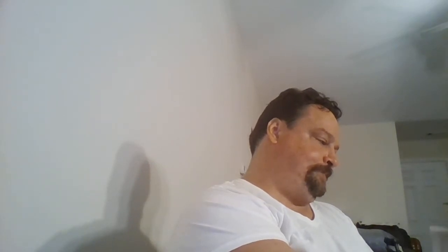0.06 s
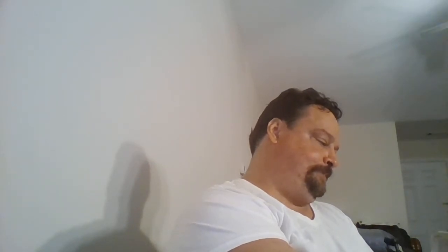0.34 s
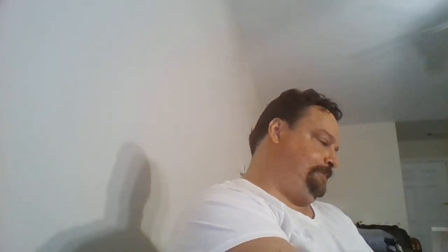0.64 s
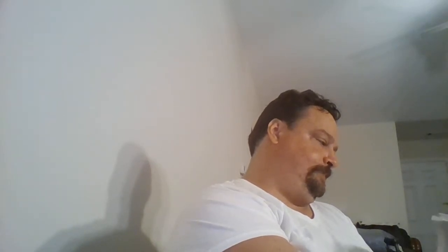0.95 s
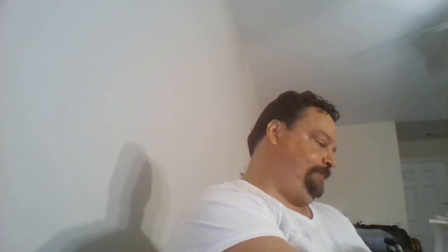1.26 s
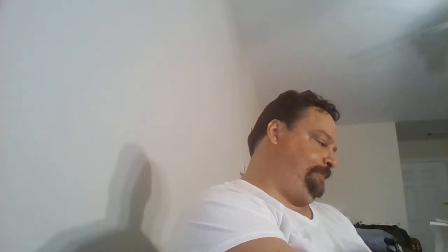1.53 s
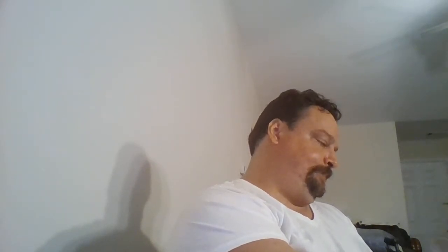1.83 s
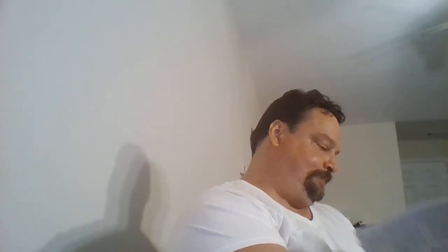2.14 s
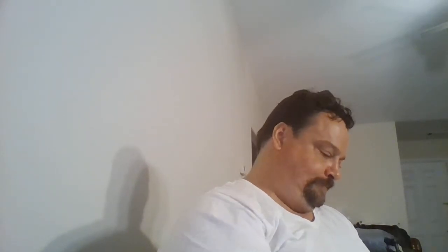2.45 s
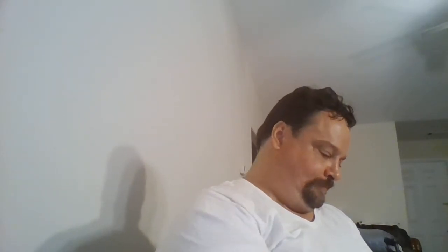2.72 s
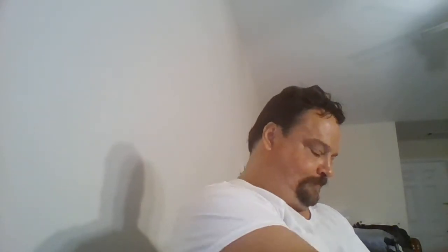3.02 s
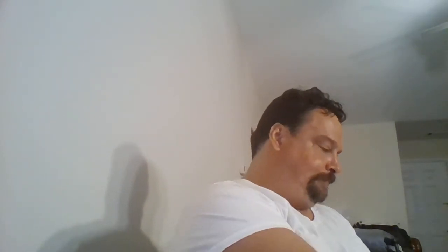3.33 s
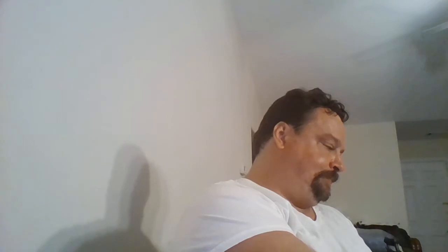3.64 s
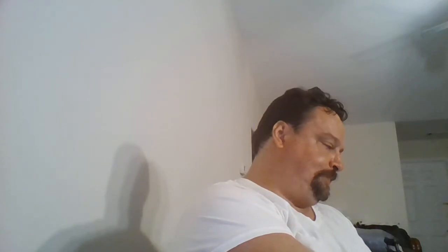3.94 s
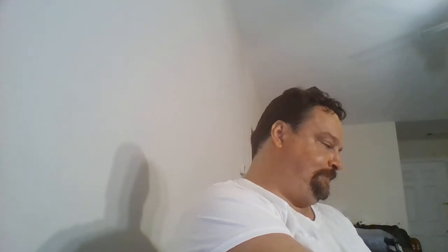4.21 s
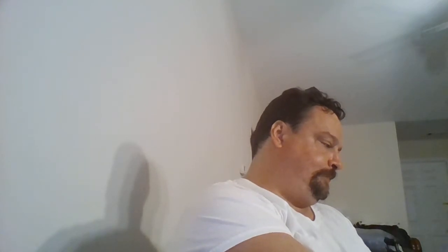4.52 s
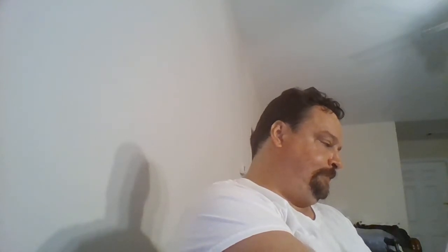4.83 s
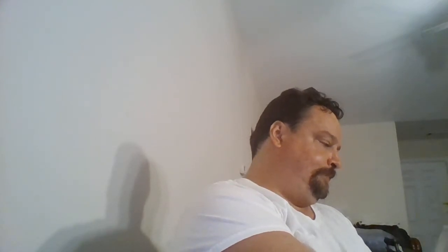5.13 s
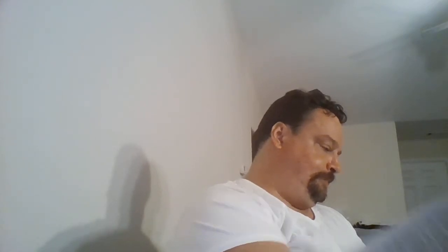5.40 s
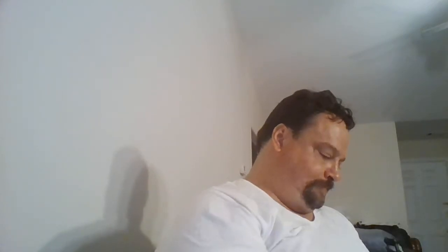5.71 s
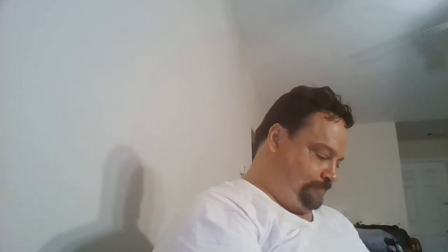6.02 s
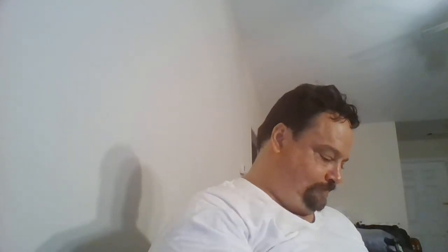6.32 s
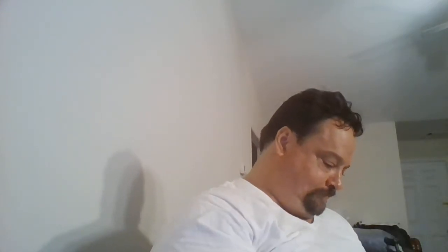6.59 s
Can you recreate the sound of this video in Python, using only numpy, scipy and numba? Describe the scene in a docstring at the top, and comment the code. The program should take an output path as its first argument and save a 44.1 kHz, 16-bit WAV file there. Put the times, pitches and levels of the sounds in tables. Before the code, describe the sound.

Two book pages are turned close by, with soft rustling, finger brushing and one crisp snap, over a faint room hum.

```python
"""Fingers slide over paper: someone leafs through a book, close to one microphone in a small, quiet room.
Two pages are turned; each sheet bends, crackles and swishes over its neighbour. The first lands with a
soft thud, the second snaps taut, which makes the recorder's limiter duck the room hum for a moment.
The microphone has a bright resonance. Behind the book lie air noise, fan tones, a faint, high
electronic whine, a motor hum and a second thin whine that swells once."""
import sys
import numpy as np
from scipy import signal
from scipy.fft import rfft, irfft
from scipy.io import wavfile
from scipy.ndimage import uniform_filter1d, minimum_filter1d
from numba import njit

SR = 44100
rng = np.random.default_rng(int(sys.argv[2]) if len(sys.argv) > 2 else 0)


def unload_wav(signal):
    """Save mono or channel-first audio to the path in sys.argv[1] as 16-bit WAV at rate SR, clipped to [-1, 1]."""
    wavfile.write(
        sys.argv[1],
        SR,
        np.round(np.clip(np.atleast_2d(signal).T, -1, 1) * 32767).astype(np.int16),
    )


N = 302514
TIME = np.arange(N) / SR
FLEX_RISE = 0.13  # share of a flex spent rising: paper bends quickly and relaxes slowly

# spectrum of a buckling sheet (frequency [Hz], level [dB])
BUCKLE_SPECTRUM = [(200, -32), (800, -11), (1400, 3), (1900, -4.5), (2500, 0.5), (3400, -12), (5000, -10),
                   (16000, -46)]
# spectrum of a soft thud or puff of air (frequency [Hz], level [dB])
THUD_SPECTRUM = [(30, -66), (70, -14), (160, 1.5), (290, -1.5), (420, -2), (600, -9.5), (1500, -12),
                 (5000, -35)]


def turning_sheets(slide_db=-5, bend_db=-1, edge_db=-2):
    """A turning sheet hisses along its neighbour, rustles lower where it bends, and its edge scrapes."""
    # spectra of sliding, bending and edge scraping (frequency [Hz], level [dB])
    slide_spectrum = [(300, -26), (1500, -39), (3500, -5), (5000, -6.5), (7000, -4), (9000, -3.5),
                      (11500, -5), (13500, -10), (16000, -20.5)]
    bend_spectrum = [(40, -52), (100, -10.5), (200, -5.5), (330, -1), (500, -11), (700, -2), (950, -11.5),
                     (1500, 2), (1900, -2.5), (2500, 2.5), (3300, -11), (5000, -9), (16000, -66)]
    edge_spectrum = [(1000, -21), (2400, -13), (3000, -1), (3500, 5), (4300, -1.5), (5500, -2), (8000, -31),
                     (16000, -52)]
    # how hard the paper slides, one list for each sheet (time [s], level [dB])
    slides = [
        [(2.14, -56), (2.3, -35), (2.34, -42), (2.386, -35.5), (2.422, -44.5), (2.444, -35.5), (2.48, -64),
         (2.5, -61)],
        [(5.222, -61.5), (5.244, -49), (5.262, -56), (5.332, -49.5), (5.396, -27.5)],
    ]
    # the sheet flexes (peak time [s], length [s], level [dB])
    flexes = [(2.226, 0.079, -42), (2.295, 0.061, -40), (2.40, .1, -57), (2.497, 0.028, -53.5),
              (2.562, 0.015, -58), (2.62, 1, -66.5), (5.236, 0.064, -48), (5.29, 0.22, -50),
              (5.383, 0.039, -41.5)]
    # its edge drags harder and harder, then slips free (peak time [s], length [s], level [dB])
    drags = [(2.248, 0.063, -49), (2.298, 0.016, -35), (2.451, .045, -38.5), (5.25, 0.011, -44.5),
             (5.397, 0.076, -44)]
    slide = friction(slide_spectrum, slips_per_s=17000, spread_db=0.5, patchy_db=2.0)
    bend = friction(bend_spectrum, slips_per_s=14000, spread_db=0.9, patchy_db=3.0)
    edge = friction(edge_spectrum, slips_per_s=9000, spread_db=4.5, patchy_db=6.5)
    return (undb(slide_db) * slide * curve(slides)
            + undb(bend_db) * bend * swells(flexes, FLEX_RISE)
            + undb(edge_db) * edge * swells(drags, rise=0.73))


def snap(crackle_db=-19, crackle_s=0.0033):
    """Each jerk of the taut sheet is a sharp pressure pulse with a brief crackle of creases behind it."""
    # the second sheet snaps taut and flaps (time [s], strength [dB])
    jerks = [(5.4016, 9.5), (5.4046, 7), (5.4131, -2), (5.4149, 1), (5.4294, -9)]
    # spectrum of the snap (frequency [Hz], level [dB])
    snap_spectrum = [(200, -19), (1000, -13), (2000, -2.5), (3800, 5), (6500, 9), (9200, 9.5), (11500, 3),
                     (13500, -8), (16000, 0)]
    pulses, size = np.zeros(N), SR // 30
    for start, db in jerks:
        jerk = undb(crackle_db) * rng.standard_normal(size) * np.exp(-TIME[:size] / crackle_s)
        jerk[0] = 1
        i = int(start * SR)
        pulses[i:i + size] += undb(db) * jerk
    return colour(pulses, snap_spectrum)


def fingers(hiss_db=-6.5, scrape_db=-2, rise=0.41):
    """Dry skin brushes the paper: a fine hiss when light, a coarser scrape when it presses."""
    # finger strokes (peak time [s], length [s], hiss level [dB], pressure as extra scrape level [dB])
    strokes = [(0.01, 0.072, -62.5, -4), (0.799, 0.076, -59, -0.5), (.97, 0.045, -65, -14),
               (1.127, 0.08, -62.5, -3), (1.838, 0.17, -59, -2.5), (1.95, 0.038, -59, -9),
               (2.056, 0.12, -51.5, -6), (2.53, 0.22, -56, -1.5), (2.78, 0.37, -65.5, -2),
               (3.017, 0.03, -48, -16), (3.132, 0.098, -53, -13), (3.295, 0.14, -55.5, -11),
               (3.37, 0.15, -57, -7), (3.496, 0.087, -53, -6.5), (3.586, .11, -50, -12.5),
               (3.864, 0.065, -58, -5), (4.01, 0.33, -63.5, -4.5), (4.18, 0.098, -67, -1.5),
               (4.325, 0.038, -62.5, -5), (4.488, 0.045, -60.5, -3.5), (4.612, 0.025, -64, 6),
               (4.667, .06, -64, -7), (4.82, .09, -64.5, -2.5), (4.987, 0.03, -58.5, -1.5),
               (5.093, 0.061, -57, -1), (5.19, .08, -66.5, 0), (5.62, .2, -63, -7),
               (6.055, 0.17, -56.5, -7.5), (6.217, 0.25, -54, -9), (6.503, 0.082, -51, -8),
               (6.563, 0.19, -51.5, -7.5), (6.843, 0.12, -64, -5)]
    # spectra of a light and a pressing finger (frequency [Hz], level [dB])
    hiss_spectrum = [(1500, -6), (4000, -14.5), (7000, -0.5), (8200, 3), (9600, 3.5), (11000, 1.5),
                     (12500, -3.5), (16000, -5.5)]
    scrape_spectrum = [(200, -1), (900, -22), (1500, 1), (2000, -7.5), (3000, -3.5), (4500, -0.5),
                       (6500, -1.5), (8500, -16.5), (12000, -19), (16000, -28)]
    light = swells([(at, length, db) for at, length, db, _ in strokes], rise)
    pressed = swells([(at, length, db + pressure) for at, length, db, pressure in strokes], rise)
    hiss = friction(hiss_spectrum, slips_per_s=14000, spread_db=-1.0, patchy_db=2.3) * light
    scrape = friction(scrape_spectrum, slips_per_s=9000, spread_db=3.5, patchy_db=1.6) * pressed
    return undb(hiss_db) * hiss + undb(scrape_db) * scrape


def handling(tick_db=-4, bump_db=-1):
    """Page edges tick crisply, the sheet buckles with dull pops, and page and hand bump the book."""
    # edge ticks, buckling pops and soft bumps (time [s], level [dB])
    ticks = [(1.842, -42), (1.8533, -31), (2.0612, -43), (2.2823, -39), (2.3869, -30), (2.557, -41),
             (3.0096, -47), (3.2854, -38.5), (3.9674, -44.5), (3.9832, -41.5), (4.1869, -42), (4.3025, -45),
             (4.6128, -44.5), (4.78, -43), (4.9766, -42.5), (5.0825, -49), (5.3474, -36), (6.2135, -40)]
    buckles = [(2.0, -47), (2.0887, -37.5), (2.2209, -31), (2.2454, -38), (2.5573, -44.5), (2.573, -54),
               (5.2295, -39.5), (5.2463, -40.5), (5.3472, -38), (5.5466, -36), (5.7066, -46), (5.7674, -43),
               (6.2, -52)]
    bumps = [(2.568, -38), (6.071, -47), (6.203, -46), (6.564, -46)]
    # spectrum of an edge tick (frequency [Hz], level [dB])
    tick_spectrum = [(300, -4), (1500, -5.5), (3500, 7.5), (6000, 4.5), (9000, 10.5), (12000, -3),
                     (16000, -29)]
    return (undb(tick_db) * bursts(ticks, tick_spectrum, decay_s=0.0015)
            + bursts(buckles, BUCKLE_SPECTRUM, decay_s=0.0056)
            + undb(bump_db) * bursts(bumps, THUD_SPECTRUM, decay_s=0.015))


def settling(sag_db=-1):
    """The second page sags into place with a dull crinkle."""
    # small sags (peak time [s], length [s], level [dB])
    sags = [(5.51, .05, -52), (5.585, .06, -57), (5.8, .03, -59)]
    crinkle = friction(BUCKLE_SPECTRUM, slips_per_s=10000, spread_db=1.5, patchy_db=3.0)
    return undb(sag_db) * crinkle * swells(sags, FLEX_RISE)


def waft():
    """The first sheet pushes a soft, low puff of air as it swings over and falls."""
    # the puff (peak time [s], length [s], level [dB])
    puff = (2.48, 0.45, -61)
    return unit(colour(rng.standard_normal(N), THUD_SPECTRUM)) * swells([puff], rise=0.4)


def room(x, wet_db, t60_s=0.26, build_s=0.021):
    """The small room adds a few near reflections and a short diffuse tail to the direct sound."""
    # reflections from wall and ceiling (delay [s], level [dB])
    echoes = [(.003, -21), (0.0104, -16), (0.0124, -11)]
    t = TIME[:SR]
    build_up = 1 - np.exp(-(t / build_s) ** 2)
    response = rng.standard_normal(SR) * np.exp(-np.log(1000) * t / t60_s) * build_up
    response *= undb(wet_db) / np.linalg.norm(response)
    response[0] = 1  # direct sound
    for delay, db in echoes:
        response[int(delay * SR)] += undb(db)
    return signal.fftconvolve(x, response)[:N]


def microphone_cavity(x, centre_hz=9200, width_hz=1300, lift_db=7):
    """The cavity in front of the microphone rings in the high treble."""
    b, a = signal.iirpeak(centre_hz, centre_hz / width_hz, fs=SR)
    return x + undb(lift_db) * signal.lfilter(b, a, x)


def room_tone(air_db=-62, waver_db=2, whine_hz=8624, whine_db=-76.5):
    """Air noise, wavering fan tones and electronic whine, a beating motor hum and a second thin whine."""
    # spectrum of the air noise and hiss (frequency [Hz], level [dB])
    air_spectrum = [(25, -59), (50, -33), (95, -7.5), (130, -8.5), (160, -2), (280, 0.5), (390, -8.5),
                    (900, -13), (1400, -10.5), (2000, -17), (7600, -20), (9100, -12.5), (11000, -19.5),
                    (15500, -20.5)]
    # fan tones and, at 8000 Hz, a faint, high electronic whine (frequency [Hz], level [dB])
    fan_and_electronics = [(59, -101), (88.7, -92), (147.5, -77), (165.5, -75.5), (177.4, -77),
                           (220.5, -73.5), (274.5, -76), (327, -92), (475, -87), (1707, -85), (3203, -85),
                           (8000, -86)]
    # mains hum and a slipping motor just under it beat slowly (frequency [Hz], level [dB])
    motor_tones = [(120, -73.5), (117.6, -77.5)]
    # the second whine swells once (peak time [s], length [s], level [dB])
    whine_swell = (2.58, .42, -64)
    air = unit(colour(rng.standard_normal(N), air_spectrum)) * undb(air_db)
    wavering = sum(tone(hz, db + waver_db * wander(rate_hz=3.79)) for hz, db in fan_and_electronics)
    motor = sum(tone(hz, db) for hz, db in motor_tones)
    whine = tone(whine_hz, 0) * np.hypot(undb(whine_db), swells([whine_swell], rise=0.42))
    return air + wavering + motor + whine


def friction(spectrum, slips_per_s, spread_db, patchy_db):
    """Fibres catch and let go: dense tiny slips of unequal size, louder and softer in uneven patches."""
    slips = (rng.random(N) < slips_per_s / SR) * rng.standard_normal(N)
    sizes = undb(spread_db * np.minimum(rng.exponential(size=N), 5))
    patches = undb(patchy_db * wander(rate_hz=110))
    return unit(colour(slips * sizes * patches, spectrum))


def bursts(events, spectrum, decay_s):
    """Each event (time [s], peak level [dB]) is a quickly dying cluster of slips."""
    track, size = np.zeros(N + SR), SR // 8
    for start, db in events:
        burst = colour(rng.standard_normal(size) * np.exp(-TIME[:size] / decay_s), spectrum)
        i = int(start * SR)
        track[i:i + size] += undb(db) * burst / np.abs(burst).max()
    return track[:N]


def swells(movements, rise, roundness=1.52):
    """Gain from (peak time [s], length above half height [s], level [dB]); rise is the rising share."""
    power = np.zeros(N)
    for peak, length, db in movements:
        near = np.abs(TIME - peak) < 5 * length
        along = (TIME[near] - peak) / length
        away = np.maximum(-along / rise, along / (1 - rise))
        power[near] += (undb(db) * 0.5 ** (away ** roundness)) ** 2
    return np.sqrt(power)


def curve(tables):
    """Gain from tables of (time [s], level [dB]); silent outside them."""
    return sum(undb(np.interp(TIME, *np.transpose(rows), left=-np.inf, right=-np.inf)) for rows in tables)


def colour(x, spectrum, size=4096):
    """Causal filter with the outline (frequency [Hz], level [dB])."""
    hz, db = np.transpose(spectrum)
    grid_hz = np.maximum(np.fft.rfftfreq(size, 1 / SR), 1)
    gain = undb(np.interp(np.log(grid_hz), np.log(hz), db))
    cepstrum = irfft(np.log(gain))
    cepstrum[1:size // 2] *= 2  # folding the cepstrum gives minimum phase
    cepstrum[size // 2 + 1:] = 0
    response = irfft(np.exp(rfft(cepstrum)))
    return signal.fftconvolve(x, response)[:len(x)]


def wander(rate_hz):
    """Smooth random drift with a spread near 1."""
    steps = rng.standard_normal(N // 20)
    return np.interp(TIME * rate_hz, np.arange(len(steps)), steps)


def tone(hz, db):
    """A sine of the given rms level."""
    return np.sqrt(2) * undb(db) * np.cos(2 * np.pi * hz * TIME + rng.uniform(0, 2 * np.pi))


def undb(db):
    """Decibels to gain."""
    return 10 ** (np.asarray(db) / 20)


def unit(x):
    """Scale to rms 1."""
    return x / np.sqrt(np.mean(x ** 2))


@njit
def hold(excess, keep):
    """The limiter's gain reduction jumps up with the excess level and relaxes slowly."""
    reduction, held = np.empty(len(excess)), 0.
    for i in range(len(excess)):
        held = max(excess[i], held * keep)
        reduction[i] = held
    return reduction


def scene():
    """The book close to the microphone, over the room tone; both channels carry the same signal."""
    rustle = turning_sheets() + settling() + fingers() + handling() + waft()
    paper = room(rustle, wet_db=-8.5) + room(snap(), wet_db=-13)
    mono = microphone_cavity(paper) + room_tone()
    return np.array([mono, mono])


def record(dry, ceiling_db=-10.5, release_s=0.17, top_hz=15700):
    """The recorder's look-ahead limiter catches the loudest peak and recovers slowly; the top is cut."""
    excess_db = 20 * np.log10(np.maximum(np.abs(dry[0]) / undb(ceiling_db), 1))
    gain = undb(-hold(excess_db, np.exp(-1 / (release_s * SR))))
    gain = uniform_filter1d(minimum_filter1d(gain, size=25), size=25)  # eases down ahead of the peak
    low_pass = signal.ellip(12, 0.2, 80, top_hz, fs=SR, output="sos")
    return signal.sosfilt(low_pass, dry * gain)


dry = scene()
out = record(dry)
unload_wav(out)
```